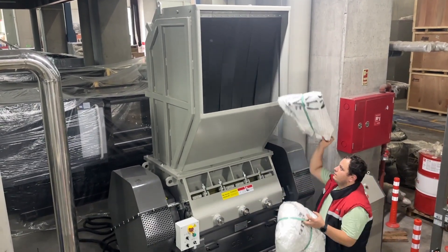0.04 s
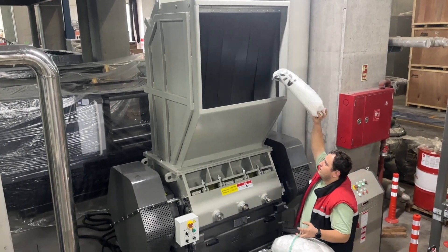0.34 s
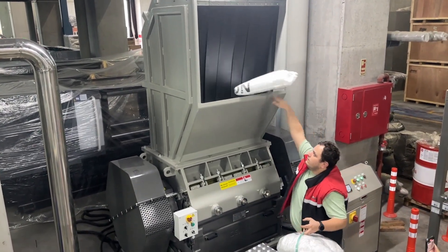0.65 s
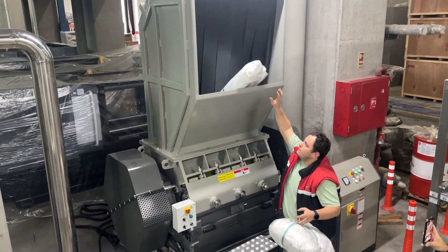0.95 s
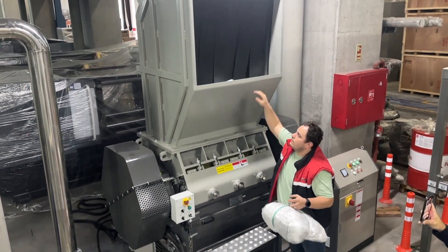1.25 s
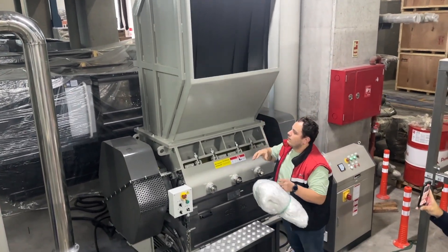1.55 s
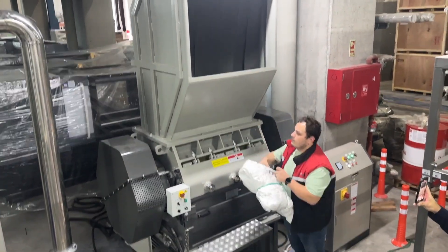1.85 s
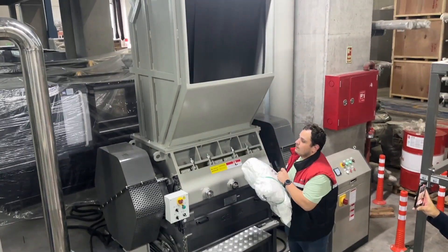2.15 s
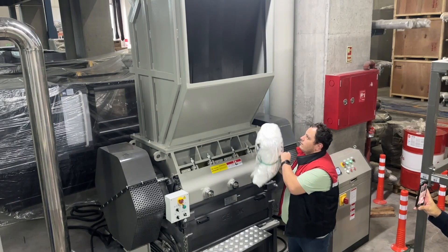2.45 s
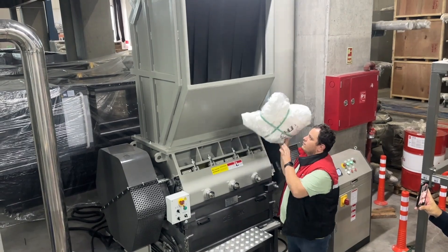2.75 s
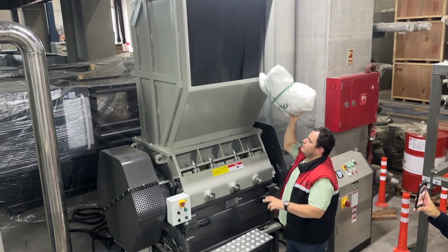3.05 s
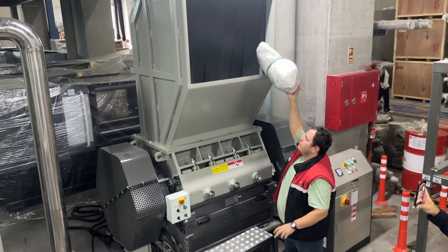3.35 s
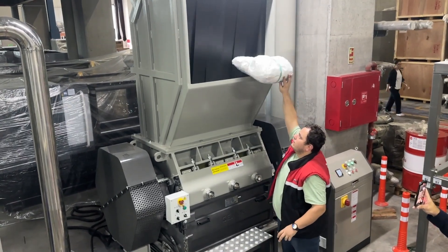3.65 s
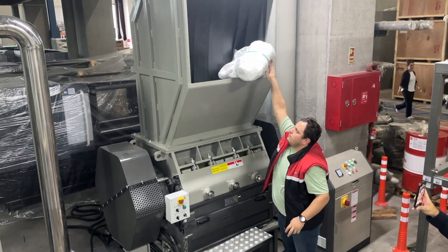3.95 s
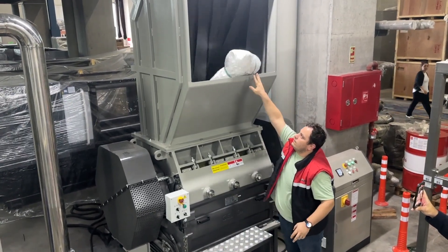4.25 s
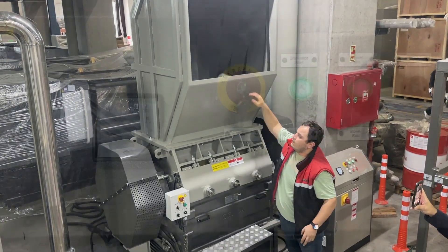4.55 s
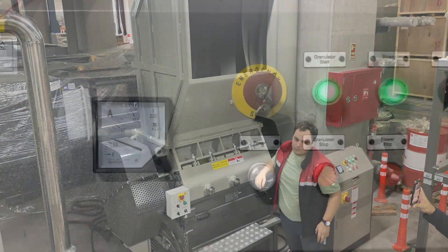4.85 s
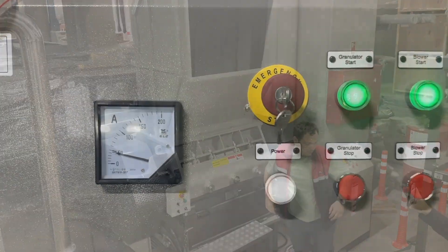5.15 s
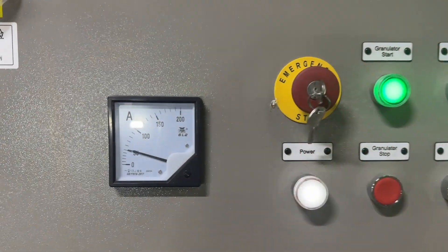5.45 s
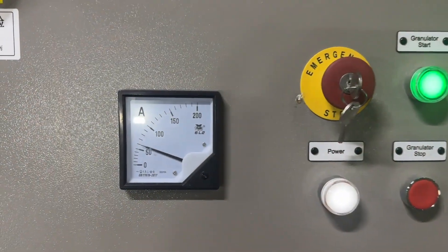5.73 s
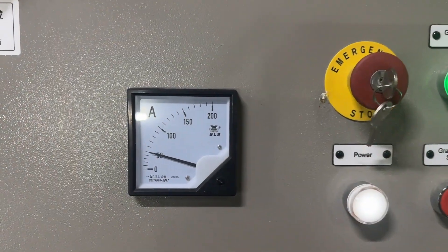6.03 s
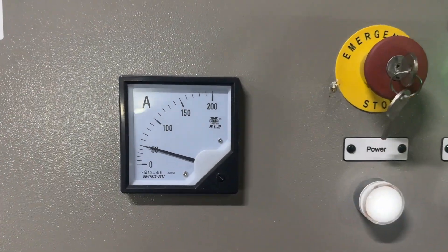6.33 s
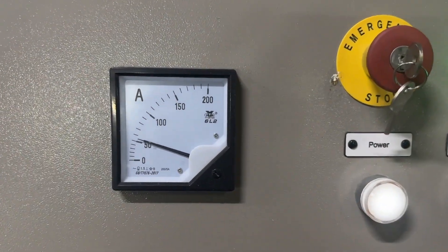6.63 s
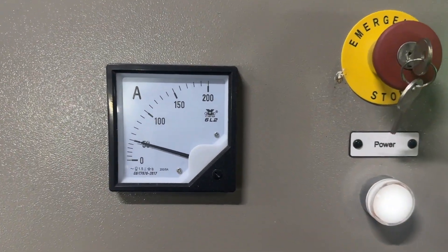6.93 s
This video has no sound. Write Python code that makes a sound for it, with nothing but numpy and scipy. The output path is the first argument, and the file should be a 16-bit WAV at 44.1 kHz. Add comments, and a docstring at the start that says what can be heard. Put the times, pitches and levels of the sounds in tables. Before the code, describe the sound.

Heard near its hopper, a plastic shredding machine hums and whines while a blower rushes steadily. Bags are ripped and ground in repeated swells, with rasping bursts and a quick cluster of dull thumps as a lump tumbles through the steel chamber. A couple of lighter knocks follow later, and the listening position fades over to the control panel, where the factory machine drones on with slower, gentler surges.

```python
"""A plastic granulator chews bags in a factory hall, heard first at its hopper, then at its control panel.
The knives pass 44 times a second and make the steel housing drone, ring and whine. Each cut tears
a burst of noise, and the sound surges whenever the rotor grabs more film. Thick wads grind, stiff film
rasps, and now and then a tough lump thumps through the chamber.
A blower hisses steadily as it carries the flakes away."""
import sys
import numpy as np
from scipy import signal
from scipy.fft import rfft, irfft
from scipy.io import wavfile
from scipy.ndimage import uniform_filter1d, minimum_filter1d

SR = 44100
rng = np.random.default_rng(int(sys.argv[2]) if len(sys.argv) > 2 else 0)


def digitize_waveform(pressure):
    """Quantize a signal to 16-bit integers and store it at the path in sys.argv[1].

    Rows of a 2-D input are taken as channels; values are limited to [-1, 1].
    """
    field = np.atleast_2d(pressure).T
    bounded = np.clip(field, -1, 1)
    quanta = np.round(bounded * 32767).astype(np.int16)
    wavfile.write(sys.argv[1], SR, quanta)


N = 317079
T = np.arange(N) / SR
FREQ = np.maximum(np.fft.rfftfreq(N, 1 / SR), 1)
KNIFE_HZ, SAG_HZ = 43.95, .285  # knife passes a second, and how much the toughest lump slows them
ROTOR_HZ = KNIFE_HZ / 3  # three knives to a turn
IDLE_DB, FILL_DB = -40, 9  # cutting between surges when empty, and what a full chamber adds
FULL_RING_DB = -18.5  # the weaker resonances follow the lowest one up and down from this level
FADE_S = (4.8, 5.21)  # the scene fades from the hopper to the panel

# the rotor grabs more film about every 0.6 s: (peak time [s], rise [s], fall [s], cutting [dB],
# low resonance [dB], middle resonance [dB], high resonance [dB])
SURGES = [(.28, 0.085, 0.19, -28.5, -18.5, -22.5, -28), (.89, 0.13, 0.18, -28, -18.5, -22, -33),
          (1.52, 0.11, 0.12, -28.5, -18.5, -22, -29.5), (2.05, 0.093, 0.14, -31, -19, -20.5, -25),
          (2.28, 0.021, .035, -38, -18.5, -33, -42), (2.57, 0.15, 0.14, -29.5, -25, -22.5, -39),
          (3.07, 0.17, 0.1, -36, -24, -24, -34), (3.66, 0.13, 0.14, -34, -19.5, -25, -27.5),
          (4.21, .12, 0.13, -31, -19.5, -22, -34), (4.76, 0.13, 0.17, -33.5, -20, -25, -33),
          (5.58, 0.19, 0.36, -33, -30, -36, -27.5), (6.44, 0.25, 0.17, -32.5, -28.5, -34, -31),
          (7.01, 0.16, 0.51, -30.5, -26.5, -34.5, -37.5)]
# how full the chamber is: (time [s], share [0-1])
FILL = [(0, 0.47), (.62, 0.31), (1.34, 0.1), (1.65, 0.86), (3.3, 0.9), (4.25, 0.64), (4.48, 0.48),
        (5.1, 0.17), (7.19, 0)]
# tones of the housing's drone at each place: (multiple of the knife rate, relative level [dB])
HOPPER_DRONE = [(1, -20), (2, -19.5), (3, -13.5), (4, -11.5), (11, -17.5), (12, -19), (14, -19.5),
                (15, -20), (16, -28.5), (17, -29.5), (21, -28.5), (22, -33), (23, -32), (26, -32.5),
                (28, -26), (30, -26.5)]
PANEL_DRONE = [(1, -17.5), (2, -18), (3, -8), (4, -15.5), (11, -21), (12, -27), (13, -21.5), (14, -22.5),
               (15, -17), (17, -19.5), (26, -20), (28, -20), (29, -30), (31, -20), (35, -18)]
# tone colour of tearing film and of tumbling pieces: (frequency [Hz], relative level [dB])
HOPPER_TEARING = [(200, -15), (330, 7), (500, 1.5), (700, 1), (1000, 3), (1400, -3.5), (2100, -8),
                  (2900, -10), (3600, -16), (4700, -19.5), (6000, -31), (10000, -34), (15000, -44)]
PANEL_TEARING = [(200, -21), (330, 14), (500, -1), (750, -0.5), (950, 3), (1400, -3), (2900, -8),
                 (4700, -21.5), (15000, -38)]
TUMBLE_COLOUR = [(28, -55), (45, -26), (62, -11), (90, -22.5), (125, -6.5), (170, -2.5), (240, -1.5),
                 (310, -7.5), (450, -9.5), (700, -18.5), (2000, -52)]
# loudness of the blower: (time [s], level [dB])
AIR_LEVEL = [(0, -35.5), (.3, -34), (.62, -34.5), (.95, -33.5), (1.2, -35.5), (1.33, -36), (1.48, -33.5),
             (2, -34.5), (3.7, -34.5), (4.25, -35.5), (4.48, -37), (4.85, -38), (5.2, -37), (5.55, -36),
             (6.3, -36.5), (7.19, -35.5)]
# tone colour of the blower at each place: (frequency [Hz], relative level [dB])
HOPPER_AIR = [(40, -26), (110, -4.5), (300, 3.5), (500, 0.5), (900, -26), (1500, -9), (2000, -17.5),
              (2600, -14), (4500, -16.5), (5900, -19.5), (7300, -19.5), (8200, -21.5), (10000, -19),
              (11600, -25.5), (15000, -28)]
PANEL_AIR = [(40, -15), (130, 5), (300, 4.5), (600, -4.5), (780, -14), (940, 1.5), (1080, -11), (1500, -5),
             (2300, -12.5), (4300, -18.5), (5400, -17), (7300, -19), (8400, -20.5), (10000, -18),
             (11400, -26), (13000, -24.5), (15000, -29)]
# the three strongest housing resonances: (multiple of the knife rate, lag behind the surge [s],
# idle at hopper [dB], idle at panel [dB], added to idle when full [dB],
# left minus right at hopper [dB], same at panel [dB], phase between the sides at panel [rad])
STRONG_RINGS = [(5, 0.0012, -39.5, -37, 18, 4, 2.9, 0), (6, 0.038, -36.5, -41, 2, 3.5, 3.7, 0),
                (9, 0.013, -40, -35.5, 5, 3.5, 6.5, 1)]
# weaker resonances: (multiple of the knife rate, level at hopper [dB], level at panel [dB],
# following of the lowest resonance [dB per dB], added when full [dB],
# left minus right at hopper [dB], same at panel [dB], phase between the sides at panel [rad])
WEAK_RINGS = [(7, -37.5, -31, .5, 4, 5, 9, 0.75), (8, -28, -33, 0.5, -9, 7.5, -11, 2.1),
              (13, -39.5, -46, 3, 5, 13, 21, 0.38), (18, -38.5, -52, 0.5, -10.5, 4, 17, 0),
              (19, -38.5, -34, 0.98, -12, -4, 14, 0.19)]
# loudness of the whine: (time [s], level [dB])
WHINE_LEVEL = [(0, -31.5), (.18, -46), (.38, -30), (.7, -48), (1.02, -30), (1.25, -39.5), (1.48, -40),
               (1.58, -26.5), (2.1, -32), (2.21, -42), (2.36, -28), (2.6, -31.5), (2.8, -27.5),
               (3.27, -27.5), (3.8, -31.5), (4.45, -27.5), (4.65, -37), (4.9, -30.5), (5.3, -35),
               (7.19, -36)]
# thick wads being ground, and stiff film being shredded: (peak time [s], rise [s], fall [s], level [dB])
GRINDS = [(.24, .07, 0.11, -28.5), (1.56, 0.057, 0.065, -33), (2.21, .05, 0.05, -27.5),
          (3.12, 0.056, 0.055, -37), (4.98, 0.055, 0.045, -33.5)]
RASPS = [(.26, 0.025, .05, -45), (.93, .09, .1, -50), (1.49, 0.046, 0.065, -46), (2.11, 0.077, 0.11, -38),
         (2.38, 0.11, 0.05, -38), (2.64, .04, .06, -47), (3.1, 0.085, 0.25, -48), (3.66, .08, 0.11, -41.5),
         (4.28, 0.073, 0.082, -42), (4.81, 0.096, 0.1, -42.5)]
# tone colour of that grinding and rasping: (frequency [Hz], relative level [dB])
GRIND_COLOUR = [(300, -25), (560, 10.5), (720, 0), (950, -0.5), (1300, -11.5), (2500, -21.5), (8000, -41)]
RASP_COLOUR = [(900, -11), (2000, 5.5), (2900, 4.5), (4000, -1.5), (5500, -9), (15000, -38)]
# tough lumps tumbling: (peak time [s], rise [s], fall [s], rumble [dB], crunch [dB], shudder [dB])
LUMPS = [(2.09, 0.061, .11, -24.5, -31.5, -40), (2.3, 0.064, 0.15, -30.5, -37.5, -53),
         (2.65, 0.044, 0.079, -37.5, -45, -41.5), (4.92, .11, 0.096, -34.5, -38.5, -35)]
# tone colour of a lump bouncing, cracking and being bitten: (frequency [Hz], relative level [dB])
BOUNCE_COLOUR = [(30, -35), (45, -22), (65, -23), (90, 3), (130, -2.5), (180, 8.5), (250, 4), (320, -3),
                 (480, -4.5), (1300, -22.5), (3300, -31), (7000, -37), (15000, -56)]
CRACK_COLOUR = [(600, -1), (2000, 4.5), (3600, -4.5), (6000, -9), (10000, -17), (15000, -21)]
BITE_COLOUR = [(200, -27), (420, 10), (600, -0.5), (900, 2.5), (1300, -11), (3000, -19), (6000, -30.5),
               (15000, -37)]
# tones on which a lump shakes the frame: (multiple of the knife rate, relative level [dB])
SHUDDER_TONES = [(1, -6), (2, -4.5), (3, -2), (7, 5.5)]
# knives biting into a lump: (time [s], thump peak [dB], crunch [dB])
BITES = [(2.044, -7, -28), (2.067, -4.5, -18), (2.088, 0, -22), (2.107, -20, -26), (2.13, -6.5, -23),
         (2.159, -12, -24), (2.261, -14, -27), (2.302, -12, -25.5), (2.57, -15, -25), (2.671, -16, -29),
         (4.87, -11.5, -29), (4.917, -16, -31)]
# chamber tones that a bite sets ringing: (frequency [Hz], relative level [dB])
THUMP_TONES = [(95, -0.5), (172, 5), (272, 8.5), (315, 6), (480, -1.5)]
# how alike left and right sound at each place: (frequency [Hz], correlation [-1 to 1])
HOPPER_LIKENESS = [(60, 1), (280, 0.75), (640, 0.45), (1400, 0.27), (3100, 0.17), (6000, 0.19),
                   (8200, -0.51), (10500, 0.96), (13500, 1), (15300, -0.44)]
PANEL_LIKENESS = [(60, 0.59), (130, 1), (290, 0.21), (640, -0.44), (3100, 0.23), (6000, 0.13),
                  (8200, -0.44), (10500, 0.95), (13500, 1), (15300, -0.37)]
# balance at each place: (frequency [Hz], left minus right [dB])
HOPPER_PAN = [(60, -1), (110, 6.5), (200, -3.5), (380, 0.5), (700, 6), (1290, 3.0), (2380, 2.0), (4400, 4),
              (8120, 2.5), (15000, -2)]
PANEL_PAN = [(60, 4), (110, 0.5), (200, 8.5), (380, -1), (700, 8.5), (1290, 5.5), (2380, 6), (4400, 11.5),
             (8120, 4.5), (15000, -2.5)]


def undb(db):
    """Turn decibels into a gain."""
    return 10 ** (np.asarray(db) / 20)


def curve(table):
    """Read a time table at every sample."""
    return np.interp(T, *np.transpose(table))


def at(table, hz):
    """Read a frequency table, with octaves evenly spaced."""
    table_hz, value = np.transpose(table)
    return np.interp(np.log(hz), np.log(table_hz), value)


def wander(rate_hz):
    """A smooth random wobble with a typical size of 1."""
    points = uniform_filter1d(rng.standard_normal(2048), 3)
    wobble = np.interp(T * rate_hz * 4, np.arange(2048), points)
    return wobble / np.sqrt(np.mean(wobble ** 2))


def swells(events, steepness=1.6):
    """Rounded rises and falls, one gain curve per level column; steepness above 2 flattens the tops."""
    power = 0
    for peak_s, rise_s, fall_s, *levels_db in events:
        distance = np.abs(T - peak_s) / np.where(T < peak_s, rise_s, fall_s)
        shape = np.exp(-distance ** steepness / np.sqrt(2))
        power = power + (undb(levels_db)[:, None] * shape) ** 2
    return np.sqrt(power)


def over_idle(gain, idle_db):
    """Level in dB of a swelling sound on top of its idle level."""
    return 20 * np.log10(np.hypot(gain, undb(idle_db)))


def sides(pan_db):
    """Left and right gains for a level difference."""
    return undb(np.array([[1], [-1]]) * pan_db / 2)


def between(at_hopper, at_panel, panel):
    """A value on the way from the hopper (panel = 0) to the control panel (panel = 1)."""
    return at_hopper + (at_panel - at_hopper) * panel


def out_of_step(spread, panel, drift_rad=.5):
    """The phase between the sides drifts as the listener moves through standing waves at the panel."""
    return (spread + drift_rad * wander(.8)) * panel


def echoes(count=12, delay_s=(.004, .04), strength=.3):
    """Nearby walls and steel panels send back faint echoes that ripple the tone colour."""
    response = np.zeros(N)
    heights = strength * rng.choice([-1, 1], count) / np.sqrt(count)
    response[(rng.uniform(*delay_s, count) * SR).astype(int)] = heights
    return 1 + rfft(response) * FREQ / np.hypot(FREQ, 1200)  # weaker below 1200 Hz


def noise(colour, likeness=HOPPER_LIKENESS, pan=HOPPER_PAN, drive=1, repeat=0, repeat_hz=KNIFE_HZ):
    """Stereo noise that pulses with drive; a share repeats with each knife pass or rotor turn."""
    mid, side = rfft(rng.standard_normal((2, N)) * drive)
    alike = np.clip(at(likeness, FREQ), -.99, .99)
    pair = mid + np.array([[1], [-1]]) * side * np.sqrt((1 - alike) / (1 + alike))
    # an echo one period later adds a faint pitch, mostly below 2200 Hz
    share = repeat / (1 + (FREQ / 2200) ** 2)
    comb = np.sqrt(1 - share ** 2) / (1 - share * np.exp(-2j * np.pi * FREQ / repeat_hz))
    out = irfft(pair * comb * echoes() * undb(at(colour, FREQ)) * sides(at(pan, FREQ)), N)
    return out / np.std(out.mean(axis=0))


def cuts(passes, fade, scatter_db):
    """Each knife pass starts a fading burst; no two cuts are equally strong."""
    size = undb(scatter_db * rng.standard_normal(N // 100))
    return size[passes.astype(int)] * np.exp(-(passes % 1) / fade)


def tone(passes, multiple, pan_db, spread, waver=.09, waver_hz=7):
    """A wavering tone at a multiple of the knife rate; the sides are spread radians out of step."""
    # housing and hall delay each multiple differently, which smears the blows into a hum
    lag = 1.3 * (multiple - 5) ** 2
    phase = 2 * np.pi * multiple * passes - lag + waver * wander(waver_hz)
    size = np.sqrt(2) * (1 + waver * wander(waver_hz))
    return size * np.cos(phase + np.array([[.5], [-.5]]) * spread) * sides(pan_db)


def drone(passes, load_db, tones, pan, spread, waver, follow):
    """The knives make the housing hum on multiples of their rate, louder under load."""
    hum = 0
    for multiple, db in tones:
        pan_db = at(pan, multiple * KNIFE_HZ)
        side_phase = spread * multiple * rng.choice([-1, 1])
        hum = hum + undb(db) * tone(passes, multiple, pan_db, side_phase, waver)
    return hum * undb(follow * (load_db - np.median(load_db)))


def chamber(passes, film_colour, likeness, pan, tear_db, tumble_db):
    """Film tears at every cut, and the pieces tumble against the chamber walls."""
    rips = 1.7 + cuts(passes, fade=.8, scatter_db=1.5)
    tearing = noise(film_colour, likeness, pan, rips, repeat=.52)
    knocks = .7 + cuts(passes, fade=.8, scatter_db=.8)
    tumbling = noise(TUMBLE_COLOUR, likeness, pan, knocks, repeat=.5, repeat_hz=ROTOR_HZ)
    return undb(tear_db) * tearing + undb(tumble_db) * tumbling


def blower(colour, likeness, pan, flutter_db=.18):
    """Air and countless small flakes rush through the duct."""
    rush = noise(colour, likeness, pan, repeat=.18, repeat_hz=ROTOR_HZ)
    return rush * undb(curve(AIR_LEVEL) + flutter_db * wander(3.4))


def resonances(passes, panel, fill, throb_db=1.5):
    """The steel housing rings: three tones swell with each surge, and weaker ones follow the lowest."""
    surges = swells(SURGES, steepness=2.25)[1:]
    out, levels_db = 0, []
    for (multiple, lag_s, hopper_db, panel_db, fill_db, *pans, spread), surge in zip(STRONG_RINGS, surges):
        idle_db = between(hopper_db, panel_db, panel) + fill_db * fill
        db = over_idle(np.interp(T - lag_s, T, surge), idle_db)
        levels_db.append(db)
        out = out + undb(db) * tone(passes, multiple, between(*pans, panel), spread * panel)
    for multiple, hopper_db, panel_db, follow, fill_db, *pans, spread in WEAK_RINGS:
        db = between(hopper_db, panel_db, panel) + fill_db * fill
        db += follow * (levels_db[0] - FULL_RING_DB) + throb_db * wander(5)
        out = out + undb(db) * tone(passes, multiple, between(*pans, panel), out_of_step(spread, panel))
    return out


def whine(passes, panel):
    """A clean tone at ten times the knife rate comes and goes."""
    pan_db = between(.5, 7.5, panel)
    return undb(curve(WHINE_LEVEL)) * tone(passes, 10, pan_db, out_of_step(1.8, panel))


def grinds(passes):
    """A thick wad is ground down with a hollow crunch, much the same at each knife pass."""
    chewing = 1.2 + cuts(passes, fade=.8, scatter_db=1.5)
    return swells(GRINDS)[0] * noise(GRIND_COLOUR, drive=chewing, repeat=.5)


def rasps(passes):
    """Stiff film rasps as the knives shred it, in a dense run of small cracks."""
    cracking = undb(2.5 * wander(65)) * (2 + cuts(passes, fade=.5, scatter_db=2.5))
    return swells(RASPS)[0] * noise(RASP_COLOUR, drive=cracking)


def lumps(passes, rumble, crunch, shudder):
    """A tough lump rumbles as it bounces on the rotor, crunches as it breaks and shakes the frame."""
    bouncing = .9 + cuts(passes, fade=.6, scatter_db=2)
    breaking = 2.5 + cuts(passes, fade=.6, scatter_db=2)
    shaking = sum(undb(db) * tone(passes, multiple, pan_db=3, spread=0) for multiple, db in SHUDDER_TONES)
    return (rumble * noise(BOUNCE_COLOUR, drive=bouncing)
            + crunch * noise(CRACK_COLOUR, drive=breaking)
            + shudder * shaking)


def bites(rise_s=.002, fall_s=.014, pitch_scatter=.022):
    """Each hard bite knocks the chamber with a dull thump and crushes the lump with a short crunch."""
    t = T[:SR // 8]
    thumps, crushing = np.zeros(N), np.zeros(N)
    tone_hz, tone_db = np.transpose(THUMP_TONES)
    blow = np.exp(-t / fall_s) * (1 - np.exp(-t / rise_s))
    for start_s, thump_db, crunch_db in BITES:
        pitch = tone_hz * (1 + pitch_scatter * rng.standard_normal(len(tone_hz)))
        start_phase = rng.uniform(0, 2 * np.pi, (len(tone_hz), 1))
        knock = blow * (undb(tone_db) @ np.sin(2 * np.pi * pitch[:, None] * t + start_phase))
        span = slice(int(start_s * SR), int(start_s * SR) + len(t))
        thumps[span] += knock / np.abs(knock).max() * undb(thump_db)
        crushing[span] += blow / blow.max() * undb(crunch_db)
    return thumps * sides(pan_db=3.4) + crushing * noise(BITE_COLOUR)


def scene():
    """The same machine from two places, one fading into the other."""
    fill = curve(FILL)
    load_db = over_idle(swells(SURGES)[0], IDLE_DB + FILL_DB * fill)
    rumble, crunch, shudder = swells(LUMPS)
    passes = np.cumsum(KNIFE_HZ - SAG_HZ * rumble / rumble.max()) / SR  # knife passes so far
    panel = np.interp(T, FADE_S, (0, 1))  # share heard at the control panel
    at_hopper = (
        undb(-26) * drone(passes, load_db, HOPPER_DRONE, HOPPER_PAN, spread=.063, waver=.4, follow=.49)
        + chamber(passes, HOPPER_TEARING, HOPPER_LIKENESS, HOPPER_PAN, load_db - .4, load_db + 2.5)
        + blower(HOPPER_AIR, HOPPER_LIKENESS, HOPPER_PAN))
    at_panel = (
        undb(-30) * drone(passes, load_db, PANEL_DRONE, PANEL_PAN, spread=.065, waver=.24, follow=.69)
        + chamber(passes, PANEL_TEARING, PANEL_LIKENESS, PANEL_PAN, load_db - 3.5, load_db + .33)
        + blower(PANEL_AIR, PANEL_LIKENESS, PANEL_PAN))
    running = np.sqrt(1 - panel) * at_hopper + np.sqrt(panel) * at_panel
    housing = resonances(passes, panel, fill) + whine(passes, panel)
    chewing = lumps(passes, rumble, crunch, shudder) + bites() + rasps(passes) + grinds(passes)
    return running + housing + chewing


def record(dry):
    """Drop the deepest bass, turn the highest peaks down gently and cut the very top of the treble."""
    bottom_hz, top_hz, ceiling = 36, 15400, .92
    dry = signal.sosfilt(signal.butter(6, bottom_hz, "high", fs=SR, output="sos"), dry)
    safe_gain = ceiling / np.maximum(np.abs(dry).max(axis=0), ceiling)
    gain = uniform_filter1d(minimum_filter1d(safe_gain, size=441), size=441)  # hold and smooth for 10 ms
    return signal.sosfilt(signal.ellip(10, .1, 80, top_hz, fs=SR, output="sos"), dry * gain)


dry = scene()
out = record(dry)
digitize_waveform(out)
```